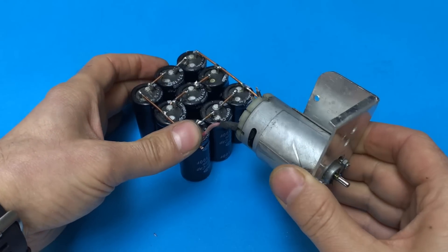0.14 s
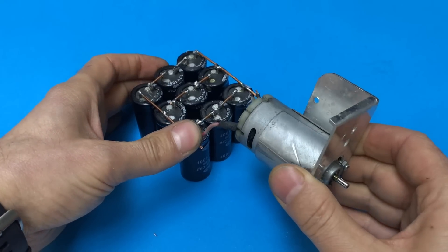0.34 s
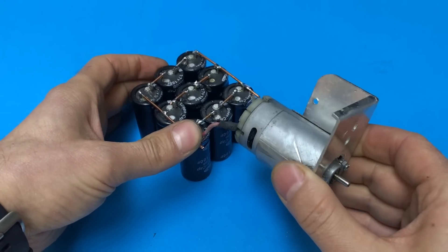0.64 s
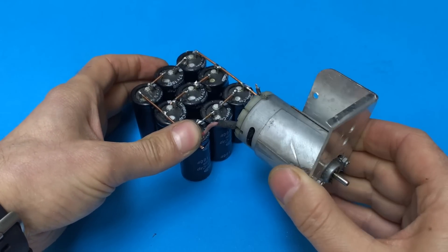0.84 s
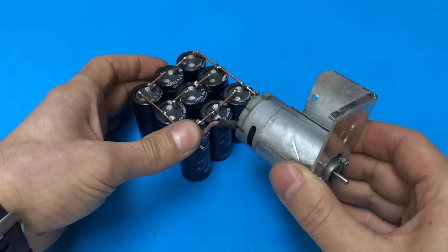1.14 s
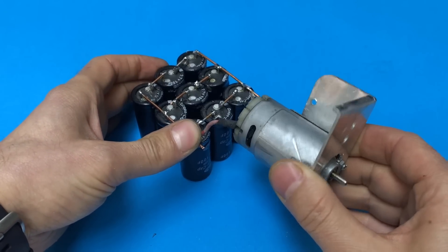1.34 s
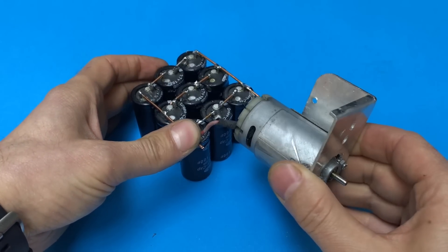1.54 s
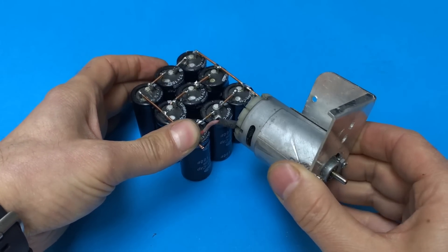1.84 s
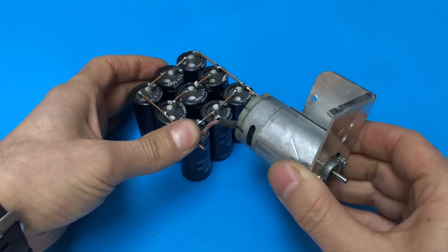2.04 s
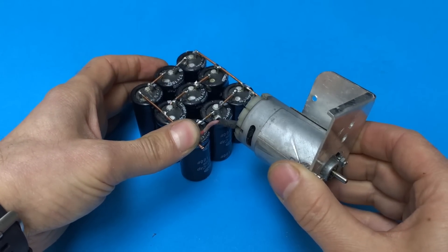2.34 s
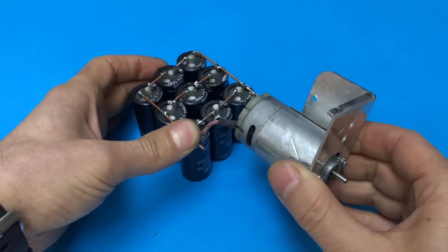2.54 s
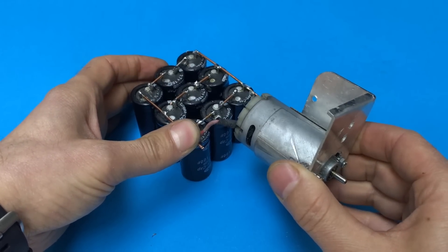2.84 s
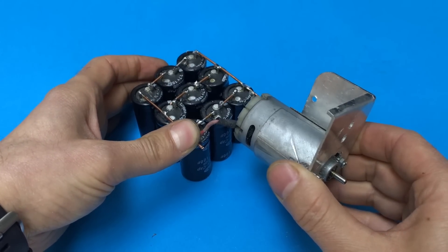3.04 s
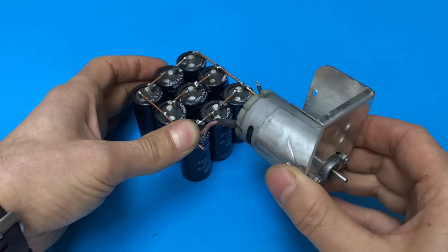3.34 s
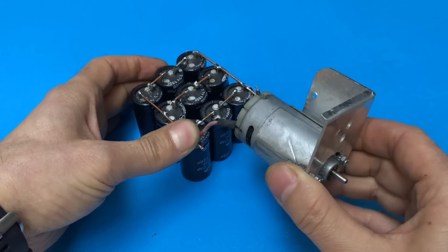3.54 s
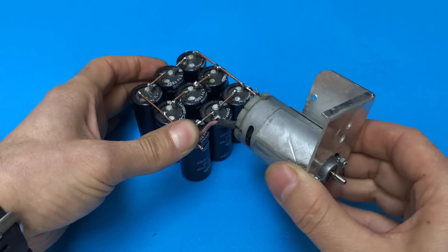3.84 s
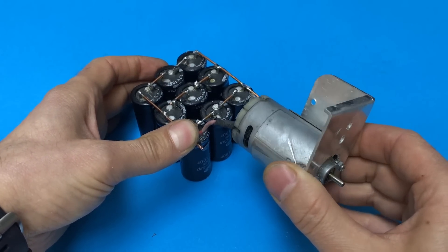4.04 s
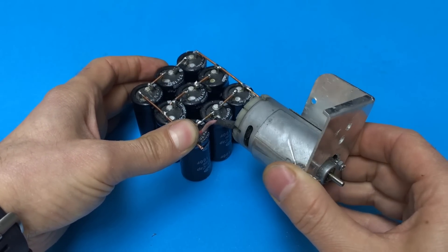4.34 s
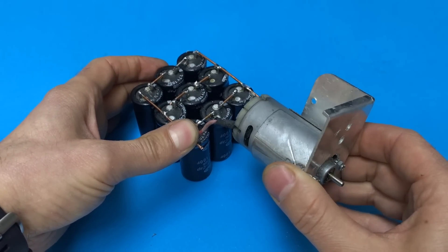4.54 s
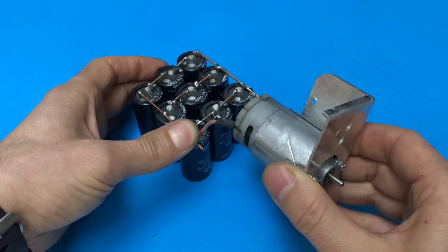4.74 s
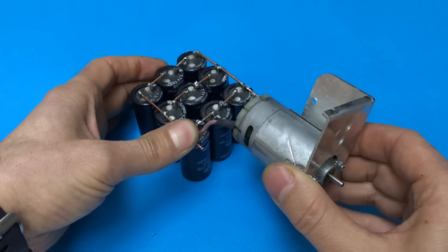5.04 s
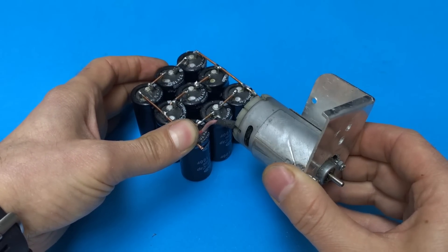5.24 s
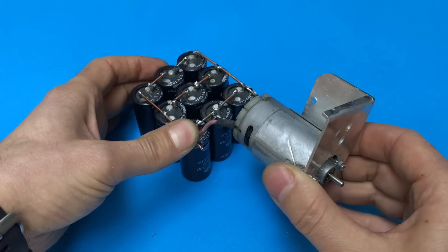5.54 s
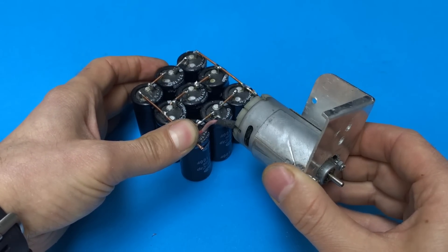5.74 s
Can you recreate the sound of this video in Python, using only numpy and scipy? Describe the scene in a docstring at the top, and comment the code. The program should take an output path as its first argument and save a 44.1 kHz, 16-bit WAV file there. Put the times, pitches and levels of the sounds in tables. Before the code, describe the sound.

Very close, dry and mono, with low room rumble and a faint thin electrical buzz underneath. At 0.5 s a wire contact snaps and sizzles, the metal case gives a dull thud, and a small brushed motor leaps almost instantly to speed. It is cut at 0.75 s and its pitch falls quickly, with grinding, brush ticks and light metallic knocks slowing to a stop by about 1.5 s, overlapped by the second start at 1.35 s. This run holds a steady, slightly wavering whine around 2.3 kHz over a lower hum near 200 Hz and bright gritty scraping. Power goes at 3.16 s; the tone slides down, with a shudder near 3.4 s and hollow knocks spacing out until about 4 s. A soft tap comes at 3.9 s. At 4.02 s sharper sparks and a thud launch the third run, which whines and scrapes steadily, slightly smoother, through the end at 6 s.

```python
"""Close and mono: a low rumble and a faint electrical buzz lie under a small brushed DC motor held in the hand.
Three times a wire is pressed onto a bank of capacitors: the contact sparks, the case jerks with a thud,
and the rotor snaps up to a steady whine of tones locked to its turning, over scraping and grinding noise.
The first two runs end in a coast down, the brushes ticking and the shaft knocking in its bearings;
the third still turns at the end. Ticks, knocks and sparks ring resonances of bracket, bearings and contact."""
import sys
import numpy as np
from scipy import signal
from scipy.fft import rfft, irfft, next_fast_len
from scipy.io import wavfile
from scipy.ndimage import uniform_filter1d

SR = 44100
rng = np.random.default_rng(int(sys.argv[2]) if len(sys.argv) > 2 else 0)


def master_out(mix):
    """Clip the mix to full scale and print it as 16-bit PCM to the path in sys.argv[1]."""
    frames = np.transpose(np.atleast_2d(mix))
    ceiling = np.clip(frames, -1, 1)
    pcm = np.round(ceiling * 32767).astype(np.int16)
    wavfile.write(sys.argv[1], SR, pcm)


N = 259749
TIME = np.arange(N) / SR

# The wire pressed on. Each row: on in seconds, off in seconds,
# dry friction while coasting in turns per second per second, offset of the rotor tones in dB.
RUNS = [(0.5, 0.749, 231, -2.5), (1.353, 3.163, 187, -.5), (4.016, 6.2, 188, .7)]
# Ring of shaft and bearings. Each row: centre in Hz, width in Hz, relative level in dB.
BEARING_MODES = [(2120, 480, -5.5), (4010, 390, -6.5), (5660, 640, -7.5), (8480, 336, 1.5), (9620, 490, 0),
                 (11580, 700, 0), (12770, 990, 0), (13240, 750, 6), (15300, 470, 2), (15000, 620, -10)]
# Hollow ring of the bracket. Each row: centre in Hz, width in Hz, relative level in dB.
BRACKET_MODES = [(810, 250, 0), (1150, 280, -0.5), (1950, 89, -15), (2750, 280, -5), (4180, 230, -2.5),
                 (5440, 140, 2)]


def from_db(db):
    """Amplitude ratio of a level in dB."""
    return 10 ** (np.asarray(db) / 20)


def rms_one(x):
    """Scale a sound to rms 1."""
    return x / np.sqrt(np.mean(x ** 2) + 1e-20)


def at_hz(points, hz):
    """Read a curve of (Hz, dB) points at any frequency, on a logarithmic frequency axis."""
    known_hz, level_db = np.transpose(points)
    return np.interp(np.log(hz + 1e-9), np.log(known_hz), level_db)


def bell(middle_s, half_s):
    """A smooth rise to 1 and fall again."""
    return np.exp(-((TIME - middle_s) / half_s) ** 2)


def drift(rate_hz):
    """Smooth chance with spread 1, changing about `rate_hz` times a second."""
    step = 16  # samples between knots
    knots = rng.standard_normal(N // step + 2)
    r = np.exp(-2 * np.pi * step * rate_hz / SR)
    # the knots pass twice, so that the smoothing has settled in the half that is kept
    slow = signal.lfilter([1], [1, -2 * r, r * r], np.tile(knots, 2))[len(knots):]
    return np.interp(np.arange(N) / step, np.arange(len(slow)), rms_one(slow))


def coloured(x, spectrum):
    """Steady sound shaped by a spectrum; rms 1."""
    size = next_fast_len(N)
    hz = np.arange(size // 2 + 1) * SR / size
    shaped = rfft(x, size) * from_db(at_hz(spectrum, hz))
    return rms_one(irfft(shaped, size)[:N])


def resonate(x, modes):
    """Parallel two-pole resonances of alternating sign."""
    out = 0
    for k, (hz, width_hz, db) in enumerate(modes):
        r = np.exp(-np.pi * width_hz / SR)
        poles = [1, -2 * r * np.cos(2 * np.pi * hz / SR), r * r]
        gain = (-1) ** k * from_db(db) * (1 - r * r) / 2
        out = out + gain * signal.lfilter([1, 0, -1], poles, x + 1e-18)
    return out


def high_pass(x, cut_hz):
    """Gentle removal of the lows below `cut_hz`."""
    return signal.sosfilt(signal.butter(2, cut_hz, "high", fs=SR, output="sos"), x)


def strikes(events, modes, contact_s, tail_db, tail_s):
    """Each event is a brief gritty contact and a weak scatter after it, ringing the modes."""
    out = np.zeros(N)
    age = TIME[:SR // 20]
    rise = 1 - np.exp(-age / .00012)
    scatter = from_db(tail_db) * np.exp(-age / tail_s)
    pressure = rise * (np.exp(-age / contact_s) + scatter)
    for s, db in events:
        hit = resonate(pressure * rng.standard_normal(len(age)), modes)
        at = round(s * SR)
        out[at:at + len(age)] += from_db(db) * hit / np.abs(hit).max()
    return out


def background(buzz_db=-59.5, odd_db=-5.5, size=720):
    """Low rumble, easing slowly and swelling once around 1.2 s, and an electrical buzz of many close steady
    lines."""
    # Colour of the rumble. Each row: frequency in Hz, relative density in dB per Hz.
    room_points = [(20, -34), (38, -7.5), (56, 4), (80, -4.5), (115, -9), (160, -19.5), (300, -22.5),
                   (600, -31.5), (2500, -41), (5000, -36), (11000, -49), (16000, -51)]
    # Colour of the buzz. Each row: frequency in Hz, relative level in dB.
    buzz_points = [(1500, -30), (1700, -4), (1980, -2), (2150, -26), (3350, -24), (3560, 1), (4050, -10),
                   (4560, 2), (5000, -8), (5520, 2), (5850, -9), (10500, -24), (15500, -15)]
    buzz_hz = 43.4
    rumble_db = -50 - 0.38 * TIME + 4 * bell(1.18, 0.29)
    rumble = from_db(rumble_db) * coloured(rng.standard_normal(N), room_points)

    # one cycle of the buzz, its odd lines weaker
    k = np.arange(size // 2)
    line_db = odd_db * (k % 2) + rng.normal(0, 4.5, len(k))
    lines = from_db(line_db) * np.exp(2j * np.pi * rng.random(len(k)))
    cycle = irfft(lines, size * 10)
    buzz = np.interp(TIME * buzz_hz % 1, np.linspace(0, 1, len(cycle), endpoint=False), cycle)
    return rumble + from_db(buzz_db) * coloured(buzz, buzz_points)


def rotor_speed(full, spin_up_s=.023, drag_s=1.0):
    """Turns per second: powered, the speed closes in on full; unpowered, drag and dry friction stop it."""
    speed = np.zeros(N)
    for on, off, friction, _ in RUNS:
        rise = 1 - np.exp(-np.maximum(TIME - on, 0) / spin_up_s)
        held = np.interp(off, TIME, full)
        drag = np.exp(-np.maximum(TIME - off, 0) / drag_s)
        coast = (held + friction * drag_s) * drag - friction * drag_s
        run = np.where(TIME < off, full * rise, np.maximum(coast, 0))
        speed = np.where(TIME < on, speed, run)
    return speed


def contact(arc_db=-35.0, arc_s=0.046):
    """The wire sparks as it lands and bounces, and sizzles while the starting current dies away."""
    # Sparks. Each row: time in seconds, peak level in dB.
    spark_events = [(0.5017, -6.5), (0.5111, -13), (1.3568, -13), (1.3605, -10), (1.364, -9),
                    (4.0222, -10.5), (4.0265, -9), (4.030, -1.5)]
    # Ring of a spark. Each row: centre in Hz, width in Hz, relative level in dB.
    spark_modes = [(2170, 380, 18), (2860, 1440, 14.5), (9500, 230, 9), (12270, 1100, 24),
                   (14200, 3000, 16.5), (16700, 900, 19.5)]
    inrush = sum((TIME > on + .005) * np.exp(-np.abs(TIME - on) / arc_s) for on, *_ in RUNS)
    sizzle = rms_one(resonate(rng.standard_normal(N) * from_db(2 * drift(300)), spark_modes))
    sparks = strikes(spark_events, spark_modes, contact_s=.0004, tail_db=-23, tail_s=.005)
    return from_db(arc_db) * inrush * sizzle + sparks


def bumps(tap_db=-5.0, tap_s=0.0095):
    """The starting torque jerks the case against the hand; once the grip shifts with a dull tap."""
    # Soft bumps. Each row: start in seconds, level in dB, pitch in Hz, time to fall by 60 dB in seconds.
    bump_events = [(0.505, -33.5, 127, 0.15), (1.354, -34.5, 133, 0.12), (3.8819, -40.5, 347, 0.03),
                   (4.018, -34, 139, 0.066)]
    out = 0
    dull = signal.butter(2, 620, fs=SR, output="sos")
    noise = rms_one(signal.sosfilt(dull, rng.standard_normal(N)))
    for s, db, hz, t60 in bump_events:
        age = np.maximum(TIME - s, 0)
        thud = np.exp(-np.log(1000) * age / t60) * np.sin(2 * np.pi * hz * age)
        tap = from_db(tap_db) * noise * (age > 0) * np.exp(-age / tap_s)
        out = out + from_db(db) * (thud + tap)
    return out


def tone(order, angle, flutter_db):
    """One multiple of the turning rate, slightly unsteady; rms near 1."""
    unsteady = from_db(flutter_db * drift(11.0))
    return np.sqrt(2) * unsteady * np.sin(order * angle + rng.uniform(0, 2 * np.pi))


def hum(angle, speed, full, level_db=-2.0, fade=3.1, pole_fade=1.74, flutter_db=0.45):
    """Imbalance and three armature poles sound multiples of the turning rate; higher tones flutter more."""
    # Tones at full speed. Each row: multiple of the turning rate, relative level in dB.
    rotor_tones = [(1, -46), (3, -42), (4, -50.5), (6, -48.5), (7, -49), (8, -54), (9, -45.5), (10, -46),
                   (11, -56), (13, -53), (14, -59), (17, -51.5), (18, -48), (19, -49), (22, -52), (23, -48),
                   (24, -46.5), (29, -52), (30, -49.5)]
    # How well the hand-held case radiates a tone. Each row: frequency in Hz, gain in dB.
    radiation = [(50, -4), (100, 0.5), (195, 0), (280, -9.5), (430, 0.5), (580, 0.5), (720, 3.5),
                 (950, 7.5), (1170, 2), (1500, -1), (1750, 1.5)]
    out = 0
    pace = speed / full
    run_db = np.zeros(N)
    for on, off, friction, db in RUNS:
        run_db[TIME >= on] = db
    for order, db in rotor_tones:
        order = round(order)
        # the turning rate and the pole tones last longest as the rotor slows
        slowing = pace ** (pole_fade if order in (1, 3, 6, 9) else fade)
        gain = from_db(db + at_hz(radiation, order * speed)) * slowing
        out = out + gain * tone(order, angle, flutter_db * np.sqrt(order))
    return from_db(level_db + run_db) * out


def whine(angle, speed, pace, whine_db=-30.0, fade=4.5):
    """Cogging, twelve times a turn, and its strongest companions, which sound only near full speed."""
    # The case carries the whine well only past 2 kHz. Each row: frequency in Hz, gain in dB.
    whine_response = [(300, -42), (900, -28), (1200, -24), (1700, -26), (1920, -19), (2050, -5), (2230, 0),
                      (2330, 0)]
    # Upper tones that swell and fade. Each row: multiple of the turning rate, loudest moment in seconds,
    # level there in dB, fall to either side in dB per second.
    overtones = [(16, 1.4, -41, 1.4), (20, 1.45, -41.5, 2.7), (21, 4.6, -40, 1.5), (27, 2.84, -38.5, 5.5),
                 (28, 5.6, -42.5, 0.5)]
    cogs_per_turn = 12
    gain = from_db(whine_db + at_hz(whine_response, cogs_per_turn * speed))
    out = gain * tone(cogs_per_turn, angle, flutter_db=1.1)
    for order, loudest_s, db, fall in overtones:
        swell = from_db(db - fall * np.abs(TIME - loudest_s))
        out = out + swell * pace ** fade * tone(round(order), angle, flutter_db=0.57)
    return out


def rubbing(angle, repeat_share, size=180, lowest_order=31):
    """Sliding contact: fine wear marks come round again every turn, the rest of the roughness is fresh."""
    orders = np.arange(size // 2)  # marks per turn
    shape = (2, size // 2)
    marks = np.exp(2j * np.pi * rng.random(shape)) * from_db(rng.normal(0, 3.8, shape))
    tracks = irfft(marks * (orders >= lowest_order), size * 20)
    around = np.linspace(0, 1, size * 20, endpoint=False)
    place = angle / (2 * np.pi) % 1
    inner, outer = (rms_one(np.interp(place, around, track)) for track in tracks)
    # the shaft creeps along its axis, from one worn track to the other
    creep = drift(1.0)
    worn = np.cos(creep) * inner + np.sin(creep) * outer
    share = np.clip(repeat_share, 0, 1)
    return np.sqrt(share) * worn + np.sqrt(1 - share) * rng.standard_normal(N)


def brushes(angle, pace, level_db=-31.0, growth=1.56, ripple_db=1.0, lean_db=0.5, low_cut_hz=480):
    """Brushes scrape over the commutator, harder at each of its three segments, and shake the case."""
    # Resonances of case and bracket. Each row: centre in Hz, width in Hz, relative level in dB.
    case_modes = [(673, 640, -3), (1040, 500, -0.5), (1478, 233, -1), (2190, 127, 7.5), (2907, 470, 2.5),
                  (4060, 495, 6), (4296, 580, 4.5), (5290, 650, 3), (6300, 3060, -4), (8200, 810, 1.5),
                  (9270, 230, 4), (9860, 200, 1.5), (11600, 1800, -16), (14700, 490, -28.5),
                  (15200, 2500, -3.5)]
    pressure_db = ripple_db * np.sin(3 * angle) + lean_db * np.sin(2 * angle) + 0.86 * drift(34)
    force = rubbing(angle, repeat_share=0.21 * pace ** 2) * from_db(pressure_db)
    scrape = high_pass(resonate(force, case_modes), low_cut_hz)
    return from_db(level_db) * pace ** growth * rms_one(scrape)


def segment_ticks(angle, pace, level_db=-19.0, growth=0.47, uneven_db=4.5, skitter_s=0.00064,
                  bearing_db=-12.0, low_cut_hz=620):
    """A brush drops into each commutator gap, three a turn; at speed it skims over them."""
    segment = np.floor(3 * angle / (2 * np.pi))
    drop = pace ** growth * np.sqrt(np.clip(1 - pace, 0, 1))
    uneven = from_db(level_db + uneven_db * rng.standard_normal(N))
    clicks = np.diff(segment, prepend=0) * drop * uneven
    # each drop skitters for a millisecond or two
    decay = np.exp(-1 / (skitter_s * SR))
    skitter = signal.lfilter([1], [1, -decay], clicks + 1e-18) * rng.standard_normal(N)
    ringing = resonate(skitter, BRACKET_MODES) + from_db(bearing_db) * resonate(skitter, BEARING_MODES)
    return high_pass(ringing, low_cut_hz)


def chatter(angle, pace, growth=1.55, loose_db=1.5, tight_db=2.0, uneven_db=1.5):
    """The shaft grinds against its bearing in one burst a turn, the bursts more distinct as it slows."""
    # Brief shudders of the shaft. Each row: middle in seconds, half length in seconds, level in dB.
    shudder_rows = [(0.622, 0.022, -30), (0.863, 0.031, -34), (0.995, 0.025, -35), (3.386, 0.012, -25.5),
                    (3.472, 0.063, -30)]
    kick_db, kick_s = -26, 0.081
    # the grinding eases by 1 dB per second as the bearings run in
    running = from_db(-30 - 1.0 * TIME) * pace ** growth
    # extra grinding under the starting torque
    starts = sum((TIME > on) * np.exp(-np.abs(TIME - on) / kick_s) for on, *_ in RUNS)
    kick = from_db(kick_db) * starts * np.clip(4 * pace, 0, 1)
    shudder = sum(from_db(db) * bell(s, half_s) for s, half_s, db in shudder_rows)

    depth_db = tight_db + loose_db * np.clip(2 * (1 - pace), 0, 1)
    bursts = from_db(depth_db * np.cos(angle) + uneven_db * drift(200))
    bursts = bursts / np.sqrt(uniform_filter1d(bursts ** 2, SR // 20))  # even out the power
    force = bursts * rubbing(angle, repeat_share=0.48 * pace ** 2)
    grind = rms_one(resonate(force, BEARING_MODES))
    return np.sqrt(running ** 2 + kick ** 2 + shudder ** 2) * grind


def knocks(angle, bracket_db=-16.5):
    """The loose shaft strikes its bearing at one point of every turn; the bracket answers hollowly."""
    # Spells of knocking. Each row: last knock in seconds, length in seconds, middling peak level in dB.
    spells = [(0.908, 0.034, -19), (1.167, 0.2, -25), (1.4157, 0.006, -12), (3.389, 0.09, -21),
              (3.6893, 0.195, -19.5), (4.0685, 0.016, -14)]
    turns = angle / (2 * np.pi)
    hits = []
    for last_s, length_s, db in spells:
        first, last = np.interp([last_s - length_s, last_s], TIME, turns)
        # count back from the last knock, one a turn
        times = np.interp(np.arange(last, first, -1), turns, TIME)
        hits += zip(times, db + rng.uniform(-3.48, 3.0, len(times)))
    bearing = strikes(hits, BEARING_MODES, contact_s=0.0012, tail_db=-21, tail_s=.006)
    bracket = strikes(hits, BRACKET_MODES, contact_s=0.0011, tail_db=-24, tail_s=.005)
    return bearing + from_db(bracket_db) * bracket


def scene():
    """One rotor angle drives the tones, friction and knocks of the motor; both channels are alike."""
    # Speed that the supply sustains. Each row: time in seconds, speed in turns per second.
    full_speed = [(1.52, 193.3), (1.78, 191.9), (1.92, 194.5), (2.06, 191.0), (2.3, 195.7), (2.58, 197.5),
                  (2.66, 196.5), (3.1, 196.9), (4.22, 193.8), (4.34, 194.7), (4.42, 193.6), (4.82, 195.8),
                  (4.96, 193.4), (5.28, 194.5), (5.48, 192.5), (5.78, 193.4), (5.86, 195.2)]
    full = np.interp(TIME, *np.transpose(full_speed))
    speed = rotor_speed(full)
    pace = speed / full
    turned = 2 * np.pi * np.cumsum(speed) / SR
    # the rotation is slightly uneven, which blurs the highest tones
    angle = turned + .009 * drift(25)
    tones = hum(angle, speed, full) + whine(angle, speed, pace)
    friction = brushes(angle, pace) + segment_ticks(turned, pace) + chatter(angle, pace)
    mono = background() + contact() + bumps() + tones + friction + knocks(turned)
    return np.tile(mono, (2, 1))


def record(dry):
    """The top is cut steeply above 15.75 kHz by an elliptic low-pass."""
    return signal.sosfilt(signal.ellip(12, .1, 80, 15750, fs=SR, output="sos"), dry)


dry = scene()
out = record(dry)
master_out(out)
```